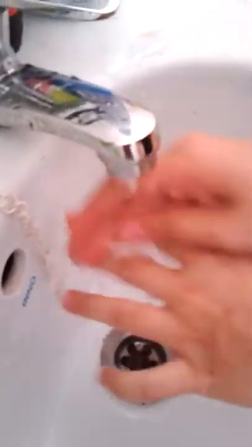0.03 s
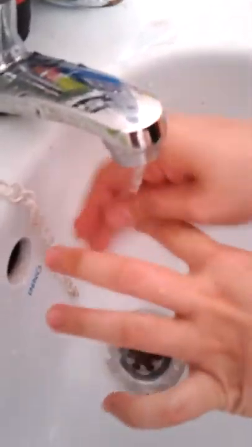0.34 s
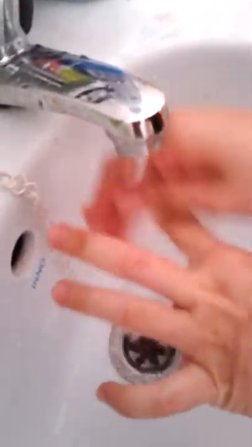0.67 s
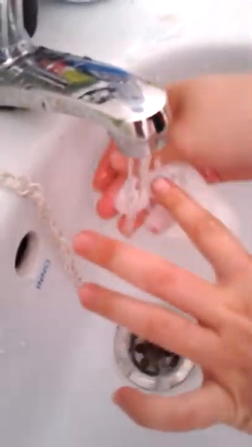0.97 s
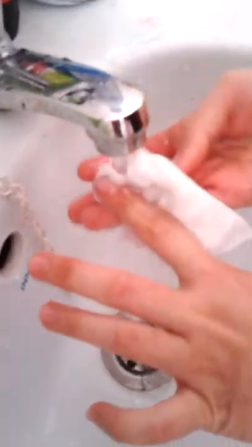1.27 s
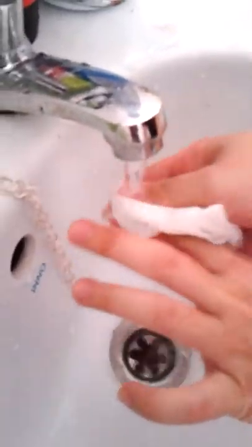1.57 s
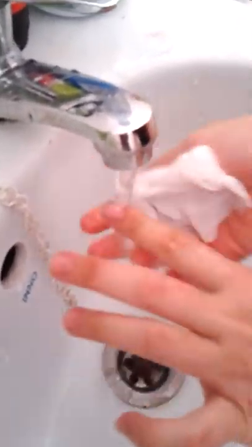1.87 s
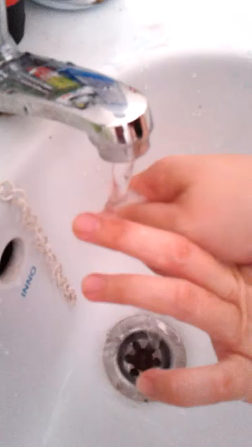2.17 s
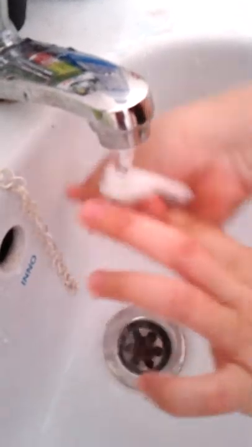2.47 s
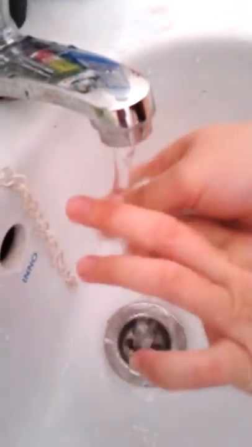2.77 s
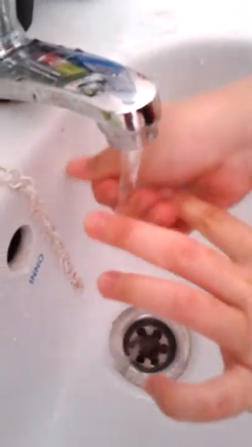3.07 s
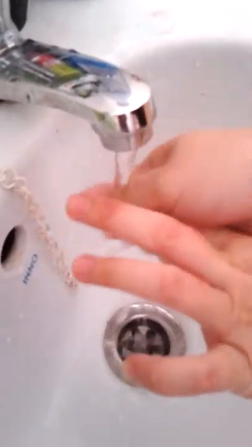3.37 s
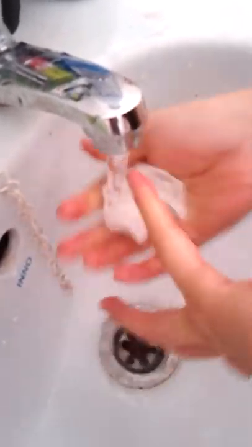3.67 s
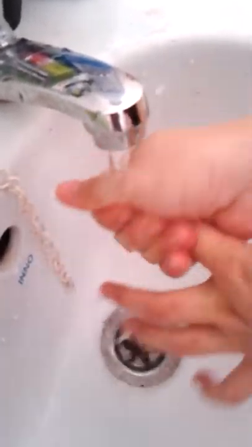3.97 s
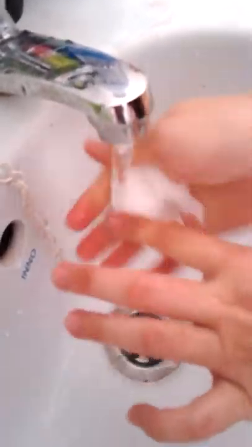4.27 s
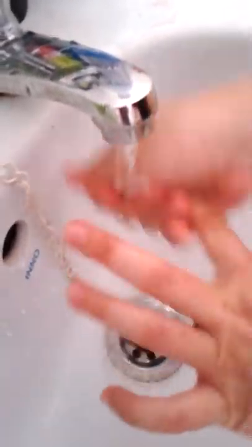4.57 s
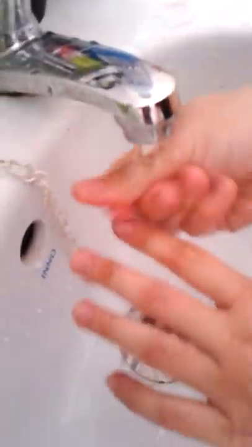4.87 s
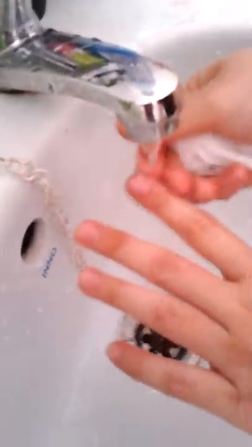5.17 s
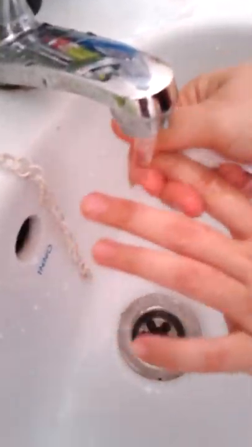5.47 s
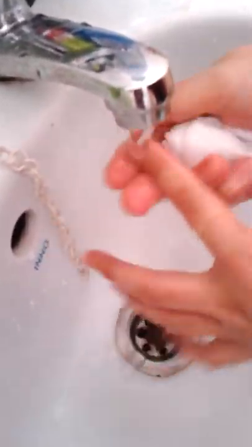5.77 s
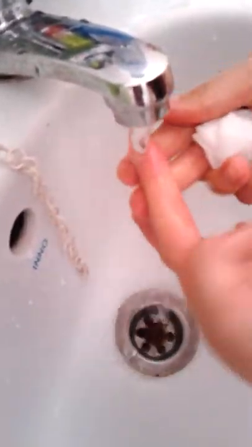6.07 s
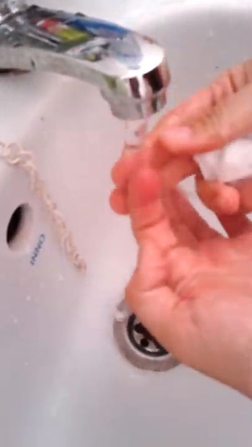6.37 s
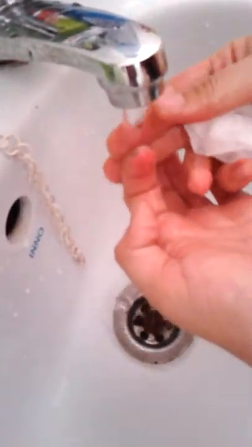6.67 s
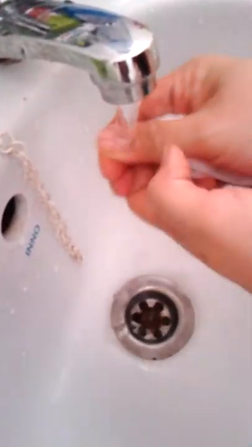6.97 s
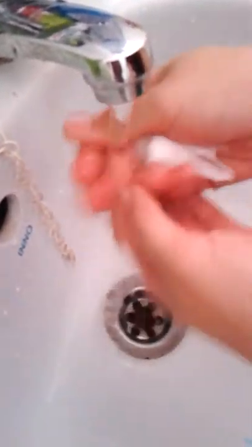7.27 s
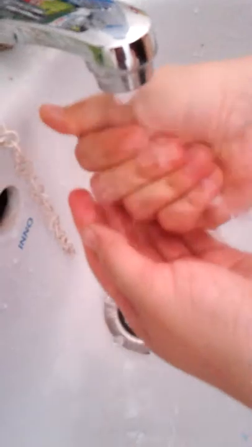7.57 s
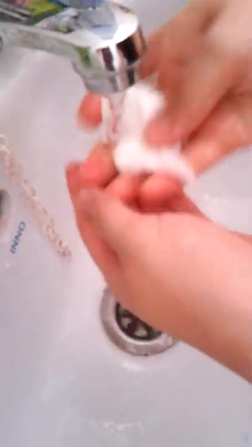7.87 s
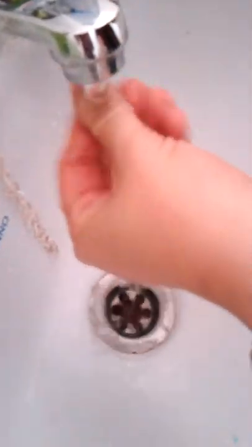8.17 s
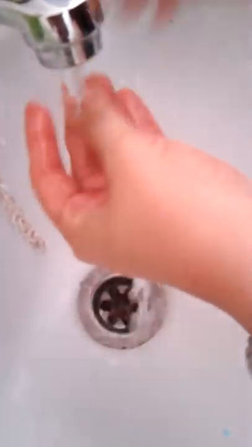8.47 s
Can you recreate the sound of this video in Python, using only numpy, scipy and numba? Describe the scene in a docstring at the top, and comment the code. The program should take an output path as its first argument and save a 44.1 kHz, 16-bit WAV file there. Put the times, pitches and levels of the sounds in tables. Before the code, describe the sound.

A thin stream of tap water splashes over hands squeezing and rubbing a wet tissue above a bathroom sink.

```python
"""A thin stream of tap water runs over two hands that squeeze and rub a wet tissue above a washbasin.
Each squeeze splashes: water films crackle on the skin and thousands of tiny bubbles ring.
Trapped air spits, plinks and gurgles, and falling water drums on the bowl and makes it ring.
A small tiled room echoes the hands; a low hum and a faint electronic whine lie underneath."""
import sys
import numpy as np
from scipy import signal
from scipy.fft import rfft, irfft
from scipy.io import wavfile
from scipy.ndimage import uniform_filter1d, map_coordinates
from numba import njit

SR = 44100
rng = np.random.default_rng(int(sys.argv[2]) if len(sys.argv) > 2 else 0)


def transcribe(signal):
    """Save signal, clipped to [-1, 1], as a 16-bit WAV file at the path in sys.argv[1]."""
    frames = np.atleast_2d(signal).T
    limited = np.clip(frames, -1, 1)
    pcm = np.round(limited * 32767).astype(np.int16)
    wavfile.write(sys.argv[1], SR, pcm)


N = 384993
TIME = np.arange(N) / SR
TOP_HZ = 16000

# The tone of the tap's even rush. Each row: frequency in Hz, relative level in dB.
STREAM_COLOUR = [(25, 0.5), (80, -7), (170, -0.5), (330, -2.5), (650, -12.5), (1250, -10), (1800, -16),
                 (5000, -22), (15500, -21)]
# The stream on resting skin, softer where the tissue catches it.
# Each row: time in seconds, relative level in dB.
SKIN_FLOW = [(0, -47.5), (0.72, -51.5), (1.8, -41.5), (2.2, -54.5), (2.75, -55), (3.3, -48.5),
             (5.45, -55.5), (5.7, -50), (8.7, -50)]
# Hands press water out of the tissue. Each row: start in seconds, length in seconds, relative level in dB.
SQUEEZES = [(0.005, 0.052, -47), (0.228, 0.06, -47.5), (0.407, 0.12, -48), (0.786, 0.048, -45),
            (1.006, 0.1, -46), (1.193, 0.012, -39.5), (1.275, 0.022, -40), (1.677, 0.039, -40.5),
            (1.944, 0.011, -29), (2.229, 0.35, -50.5), (2.428, 0.098, -42), (2.565, 0.12, -47.5),
            (2.812, 0.08, -43.5), (2.967, 0.15, -44.5), (3.309, 0.031, -40.5), (3.494, 0.15, -45.5),
            (3.86, 0.07, -48), (4.026, 0.12, -42.5), (4.436, 0.013, -42), (4.507, 0.11, -51),
            (4.929, 0.11, -48), (5.25, 0.064, -47.5), (5.67, 0.038, -47), (6.463, 0.12, -49),
            (6.762, 0.25, -46), (7.053, 0.26, -46), (7.176, 0.19, -43.5), (7.606, 0.26, -47.5),
            (8.1, 0.21, -45.5), (8.335, 0.1, -44), (8.589, 0.042, -45.5)]
# The tone of the spray. Each row: frequency in Hz, relative level in dB.
SPRAY_COLOUR = [(1000, -19.5), (2000, -19), (3600, -10), (6500, 1), (9000, 4.5), (12000, 3.5), (15500, -10)]
# How much water the hands hold. Each row: time in seconds, boost of the larger bubbles in dB.
WETNESS = [(0, 6.5), (0.45, -1), (1.55, -1), (1.95, -2), (2.3, 8), (2.55, -13), (2.85, -0.5), (5.15, -1),
           (5.9, -52), (6.4, -1.5), (7.25, -2), (8.6, 4)]
# The notes the bowl rings with. Each row: pitch in Hz, seconds to fade by 60 dB, relative level in dB.
BOWL_NOTES = [(195.2, 0.92, -5.5), (269.5, 0.28, 11.5), (293, 0.072, 6.5), (349.7, 0.35, -6.5),
              (414.7, 0.22, -7), (442, 0.28, -5.5), (534.5, 0.37, -9)]
# A cupped hand tips water onto the bowl.
# Each row: start in seconds, relative level in dB, length in seconds.
SPILLS = [(0.043, -43, 0.33), (0.794, -35.5, 0.03), (1.071, -35.5, 0.015), (1.217, -37, 0.013),
          (1.64, -34, 0.062), (1.945, -39, 0.025), (2.526, -41.5, 0.024), (3.002, -45.5, 0.032),
          (3.885, -38.5, 0.047), (4.104, -41, 0.031), (4.919, -36.5, 0.0092), (5.581, -31.5, 0.02),
          (6.056, -34.5, 0.017), (6.202, -39, 0.02), (6.593, -37.5, 0.12), (6.725, -31.5, 0.035),
          (6.967, -36.5, 0.01), (7.122, -37.5, 0.4), (7.201, -33.5, 0.027), (7.649, -34, 0.091),
          (7.863, -43.5, 0.26), (8.123, -34.5, 0.018)]
# How long the tiled room echoes. Each row: frequency in Hz, seconds to fade by 60 dB.
ROOM_DECAY = [(500, 0.33), (2500, 0.38), (7000, 0.3), (14000, 0.3)]
# Single large bubbles. Each row: start in seconds, peak level in dB, starting pitch in Hz.
PLINKS = [(0.032, -27.5, 2150), (0.104, -32, 2600), (0.238, -33, 3850), (0.569, -27.5, 3240),
          (1.242, -30.5, 4500), (1.2819, -24.5, 2370), (1.316, -28, 2140), (1.595, -31, 2920),
          (2.406, -30, 2870), (2.453, -24, 2770), (2.58, -33, 2620), (2.643, -28, 2330),
          (3.002, -23.5, 6500), (3.031, -23, 4770), (3.105, -29.5, 2140), (3.146, -24, 5070),
          (3.233, -34.5, 3060), (3.453, -26, 6000), (4.104, -41, 2870), (4.576, -49, 3140),
          (4.78, -29.5, 2800), (5.535, -34, 3500), (6.137, -26.5, 5100), (6.438, -36.5, 2530),
          (6.609, -27, 5800), (6.792, -28, 2820), (6.886, -28, 3140), (7.343, -30.5, 2150),
          (7.555, -37, 2480), (8.235, -27, 4400), (8.569, -33, 3800), (8.63, -35, 3760)]
# Air spits from the tissue and fingers. Each row: start in seconds, relative level in dB, pitch in Hz.
SPITS = [(0.495, -14.5, 7150), (0.8834, -23, 4700), (1.079, -21, 7060), (1.147, -24.5, 5270),
         (1.1743, -22.5, 3500), (1.5034, -22, 3670), (1.691, -12, 7100), (1.945, -4.5, 6800),
         (1.952, -7.5, 4800), (2.4512, -17.5, 3120), (2.5027, -18.5, 4200), (3.165, -19, 7400),
         (3.784, -25, 6300), (4.048, -19.5, 5460), (4.508, -23, 5500), (4.63, -21.5, 6840),
         (4.774, -24, 8200), (4.913, -19.5, 7660), (4.941, -18, 7650), (5.0786, -19.5, 8150),
         (5.258, -24.5, 12200), (5.652, -23, 11200), (6.1387, -14.5, 10000), (6.174, -19.5, 6540),
         (6.7028, -25, 10900), (7.2399, -14.5, 6400), (7.3774, -20, 6700), (7.455, -13, 9600),
         (7.5808, -22, 12400), (7.598, -15.5, 6320), (7.812, -22, 6540), (8.402, -21, 7000)]
# Air churns in a hand that opens or closes. Each row: start in seconds, level in dB,
# length in seconds, first pitch in Hz, last pitch in Hz, pitch scatter in octaves.
GURGLES = [(1.946, -42, 0.032, 1340, 1490, 0.46), (3.565, -39.5, 0.032, 940, 1150, 0.59),
           (4.576, -41.5, 0.011, 2310, 5200, 0.096), (8.225, -48, 0.072, 1760, 1450, 0.11),
           (8.397, -38, 0.008, 1100, 1080, 0.26), (8.465, -48.5, 0.027, 895, 1550, 0.33)]


def undb(db):
    """Turn decibels into a gain to multiply by."""
    return 10 ** (np.asarray(db) / 20)


def unit(x):
    """Scale a sound to an average (rms) level of 1."""
    return x / np.sqrt(np.mean(x ** 2) + 1e-18)


def on_log_axis(hz, points):
    """Read between (Hz, value) points, giving every octave the same width."""
    point_hz, value = np.transpose(points)
    return np.interp(np.log(hz + 1), np.log(point_hz), value)


def colour(x, points):
    """Shape a sound's tone with a curve of (Hz, dB) points."""
    hz = np.fft.rfftfreq(len(x), 1 / SR)
    return irfft(rfft(x) * undb(on_log_axis(hz, points)), len(x))


def wander(per_s):
    """A slow drift: random values joined by straight lines."""
    times = np.arange(0, TIME[-1] + 1, 1 / per_s)
    return np.interp(TIME, times, rng.standard_normal(len(times)))


def add(out, start_s, x):
    """Mix x into out from start_s on."""
    first = max(int(start_s * SR), 0)
    part = out[first:first + len(x)]
    part += x[:len(part)]


@njit
def bubbles(start_s, hz, cycles, gain, glide):
    """Each bubble is a tone that swells as it pinches off, then dies; glide lifts it as it surfaces."""
    out = np.zeros(N)
    for k in range(len(start_s)):
        first = max(int(start_s[k] * SR), 0)
        length = int(cycles[k] * SR / hz[k]) + 2
        phase = 0.
        for i in range(min(length, N - first)):
            age = i / length
            phase += 2 * np.pi * min(hz[k] * (1 + glide * age) / SR, .45)
            envelope = min(10 * age, 2 * np.exp(-7 * age))
            out[first + i] += gain[k] * envelope * np.sin(phase)
    return out


def swarm(count, low_hz, high_hz, cycles, scatter_db, cluster_db=4, glide=0.23):
    """A steady crowd of bubbles: most are quiet, a few stand out."""
    when, pitch, life, luck = rng.random((count, 4)).T
    hz = low_hz * (high_hz / low_hz) ** pitch
    # bubbles close in time and pitch are alike in loudness
    clusters = map_coordinates(rng.standard_normal((400, 8)), [when * 399, pitch * 7], order=1)
    db = cluster_db * clusters - scatter_db * np.log(luck + 0.23)
    gain = undb(db) * rng.choice([-1, 1], count)
    return unit(bubbles(when * N / SR, hz, cycles * 2 ** (2 * life - 1), gain, glide))


def gushes(source, rows, fade_s, sag_db_per_s=13):
    """Cut a steady sound into gushes that start quickly, weaken as the water runs out, and fade."""
    wanted_power, t = np.zeros(N), TIME[:SR // 2]
    for start, db, length in rows:
        envelope = np.minimum(2 * t / fade_s, 1) * np.exp(-np.maximum(t - length, 0) / fade_s)
        add(wanted_power, start, (undb(db - sag_db_per_s * t) * envelope) ** 2)
    source_power = uniform_filter1d(source ** 2, SR // 10)
    return source * np.sqrt(wanted_power / (np.abs(source_power) + 1e-12))


def stream(rush_db=-53, trickle_db=-64):
    """The tap rushes evenly and the water trickles toward the drain."""
    rush = unit(colour(rng.standard_normal(N), STREAM_COLOUR))
    trickle = swarm(count=12000, low_hz=470, high_hz=1500, cycles=30, scatter_db=2, cluster_db=1, glide=0.)
    return undb(rush_db) * rush + undb(trickle_db) * trickle


def spurts(per_s=50, decay_s=0.008, depth=0.7):
    """Water slips between the fingers in fits: a gain that jumps at random moments and falls back."""
    jumps = (rng.random(N) < per_s / SR) * rng.uniform(.3, 1, N)
    power = signal.lfilter([1], [1, -np.exp(-1 / (decay_s * SR))], jumps)
    return np.sqrt(1 - depth + depth * power / power.mean())


def splash(spray_db=3.5, bubble_db=-4, mist_db=-9.5, fade_s=0.024):
    """The stream breaks on skin and tissue into a swish of crackling films, fizz and larger bubbles."""
    start, length, db = np.transpose(SQUEEZES)
    crackle = swarm(count=24000, low_hz=900, high_hz=16200, cycles=5.4, scatter_db=3)
    fizz = swarm(count=1500, low_hz=3400, high_hz=14500, cycles=36, scatter_db=2.5)
    spray = unit(colour(2 * crackle + fizz, SPRAY_COLOUR))
    babble = swarm(count=2600, low_hz=2350, high_hz=5500, cycles=11, scatter_db=3.2, cluster_db=5)
    mist = swarm(count=6000, low_hz=11460, high_hz=15000, cycles=22, scatter_db=4)
    # a full palm makes large bubbles, a thin film makes fine mist
    wet_db = np.interp(TIME, *np.transpose(WETNESS))
    layers = [(spray, spray_db), (babble, bubble_db + wet_db), (mist, mist_db - 0.14 * wet_db)]
    squeezed = sum(undb(layer_db) * gushes(source, zip(start, db, length), fade_s)
                   for source, layer_db in layers)
    # on resting skin the stream only whispers, with separate droplets ticking through
    droplets = swarm(count=350, low_hz=3900, high_hz=15000, cycles=18, scatter_db=4.5, cluster_db=2)
    whisper = undb(-4) * spray + undb(-17) * babble + undb(-11) * mist
    whisper = np.roll(whisper, SR)  # shifted a second so it does not double the squeezes
    flow = undb(np.interp(TIME, *np.transpose(SKIN_FLOW)))
    return spurts() * (squeezed + flow * whisper) + flow * undb(-8) * droplets


def basin(knock_db=3, patter_db=-2.5, drip_db=-53, drops_per_s=400, fall_s=0.025, shed_db=-8):
    """Water makes the bowl ring: steady dripping, a patter after each squeeze, a knock for each spill."""
    t = TIME[:SR // 3]
    ring = sum(undb(db) * np.sin(2 * np.pi * hz * t) * 1000 ** (-t / ring_s)
               for hz, ring_s, db in BOWL_NOTES)
    drops = rng.standard_normal(N) * (rng.random(N) < drops_per_s / SR)
    drumming = unit(signal.fftconvolve(drops, ring)[:N])
    # part of each squeeze lands a moment later; those under 0.027 seconds shed less water
    shed = [(start + fall_s, db + shed_db + 10 * np.log10(min(length / 0.027, 1)), length)
            for start, length, db in SQUEEZES]
    patter = gushes(drumming, list(SPILLS) + shed, fade_s=0.041)
    out = undb(patter_db) * patter + undb(drip_db) * np.roll(drumming, SR)
    for start, db, _ in SPILLS:
        add(out, start, undb(db + knock_db) * ring / np.abs(ring).max())
    # hands and water shift over the bowl, so its ring wavers in pitch
    out = map_coordinates(out, [(TIME + 0.0007 * wander(per_s=12)) * SR], order=1)
    # the bowl is too small to give off deep bass
    return signal.sosfilt(signal.butter(4, 190, "high", fs=SR, output="sos"), out)


def hum(hz=147, db=-60):
    """A low hum whose pitch and level waver."""
    wavering_hz = hz * (1 + 0.012 * wander(per_s=20))
    phase = 2 * np.pi * np.cumsum(wavering_hz) / SR
    return np.sqrt(2) * np.sin(phase) * undb(db + 3 * wander(per_s=6))


def tile_echo(gap_s=0.002, bowl_s=0.012):
    """The room's answer to a click: a bright tail, strongest at first as the bowl throws sound back."""
    t = TIME[:SR // 2]
    octave_edges = np.append(0, SR / 2 ** np.arange(7, 0, -1))
    spectrum = rfft(rng.standard_normal(len(t)))
    hz = np.fft.rfftfreq(len(t), 1 / SR)
    tail = np.zeros(len(t))
    for low, high in zip(octave_edges, octave_edges[1:]):
        band = irfft(spectrum * (hz >= low) * (hz < high), len(t))
        tail += band * 1000 ** (-t / on_log_axis((low + high) / 2, ROOM_DECAY))
    tail *= (t > gap_s) * (1 + np.exp(-t / bowl_s))
    return tail / np.linalg.norm(tail)


def room(x, echo_db=-2.5, places=4):
    """The hands keep moving, so their echo glides through a few patterns, once round every second."""
    offsets = np.arange(places)[:, None] / places
    shares = np.maximum(np.cos(2 * np.pi * (TIME - offsets)), 0)
    echo = sum(signal.oaconvolve(x * share, tile_echo())[:N] for share in shares)
    return x + undb(echo_db) * echo


def plinks(cycles=32, glide=0.18, splat_tones=6, splat_s=0.006):
    """A large bubble rings with a clear pitch, amid the short splat of the drop that trapped it."""
    start, db, hz = np.transpose(PLINKS)
    lag, detune, life = rng.random((len(start), splat_tones, 3)).T
    out = bubbles(start, hz, cycles * 2 ** (life[0] - .5), undb(db), glide)
    splat_cycles = np.full(len(start), cycles / splat_tones)
    for k in range(splat_tones):
        splat_hz = hz * 2 ** (2 * detune[k] - .5)
        out += bubbles(start + splat_s * lag[k], splat_hz, splat_cycles, undb(db) / 2, glide=0.)
    return out


def spits(attack_s=0.0008, decay_s=0.0024, crack_db=-2, tick_db=-32.5, ring_db=-5.5, limit_db=-18):
    """An air pocket bursts: its water film tears with a tick, and its size sets the pitch of a crack."""
    out, t = np.zeros(N), TIME[:SR // 40]
    envelope = np.minimum(t / attack_s, 1) * np.exp(-t / decay_s)
    treble = signal.butter(2, [9500, TOP_HZ], "band", fs=SR)
    for start, db, hz in SPITS:
        burst, film = rng.standard_normal((2, len(t))) * envelope
        pocket = signal.iirpeak(min(hz, TOP_HZ), Q=2.4, fs=SR)
        crack = signal.lfilter(*pocket, signal.lfilter(*pocket, burst) + .5 * burst)
        tick = signal.lfilter(*treble, film)
        add(out, start, crack / np.abs(crack).max() * undb(db + crack_db))
        add(out, start, tick / np.abs(tick).max() * undb(tick_db))
    # the closing film traps a larger, lower bubble; past a limit, harder bursts ring no louder
    start, db, hz = np.transpose(SPITS)
    ring_hz = hz * rng.uniform(0.743, 0.99, len(start))
    cycles = np.full(len(start), 30.)
    gain = undb(np.minimum(db, limit_db) + ring_db)
    return out + bubbles(start + 0.001065, ring_hz, cycles, gain, glide=0.11)


def gurgles(cycles=7., count=80):
    """A quick run of big bubbles in a cupped hand; their pitch slides as its hollow changes size."""
    out = np.zeros(N)
    for start, db, length, first_hz, last_hz, scatter in GURGLES:
        progress = (np.arange(count) + rng.random(count)) / count
        hz = first_hz * (last_hz / first_hz) ** progress
        hz *= 2 ** (scatter * rng.standard_normal(count))
        gain = rng.standard_normal(count)
        run = bubbles(start + length * progress, hz, np.full(count, cycles), gain, glide=0.)
        out += run * undb(db) * np.sqrt(length * SR / np.sum(run ** 2))
    return out


def scene():
    """The hands splash in the room, over the drumming bowl, the running tap and the hum."""
    hands = splash() + spits() + plinks() + gurgles()
    return (room(hands) + basin() + stream() + hum())[None]


def record(dry, whine_hz=12000, whine_db=-61):
    """Add a thin electronic whine and cut off the highest treble."""
    whine = undb(whine_db) * np.sin(2 * np.pi * whine_hz * TIME)
    treble_cut = signal.ellip(8, .2, 70, TOP_HZ, fs=SR, output="sos")
    return signal.sosfilt(treble_cut, dry + whine)


dry = scene()
out = record(dry)
transcribe(out)
```